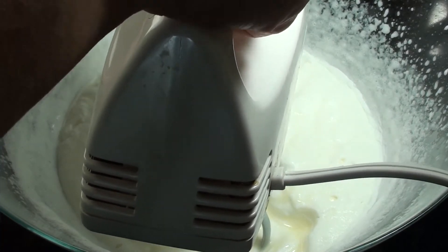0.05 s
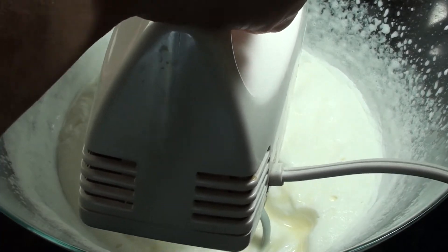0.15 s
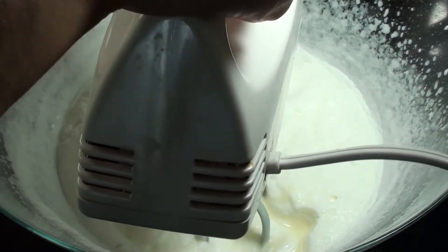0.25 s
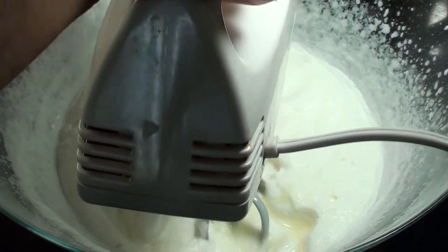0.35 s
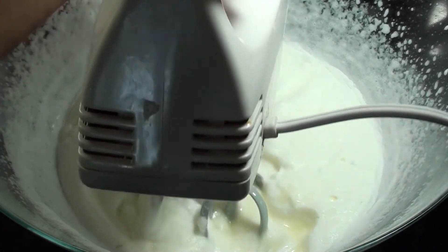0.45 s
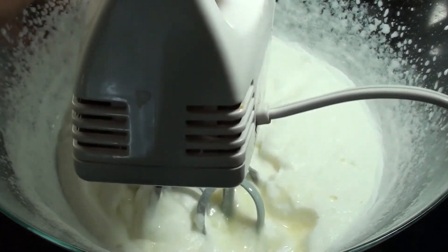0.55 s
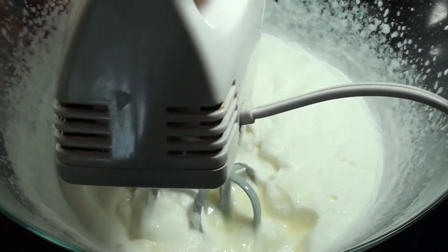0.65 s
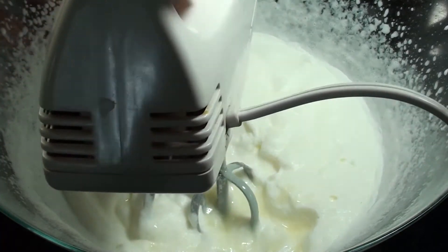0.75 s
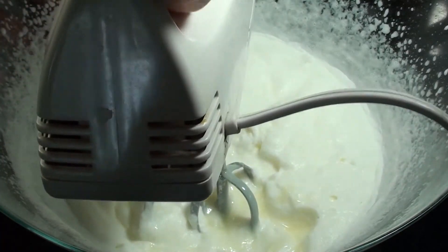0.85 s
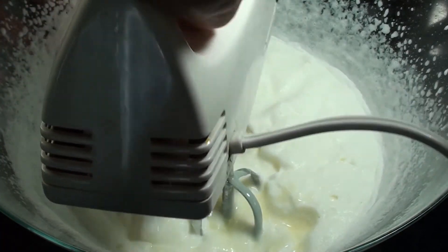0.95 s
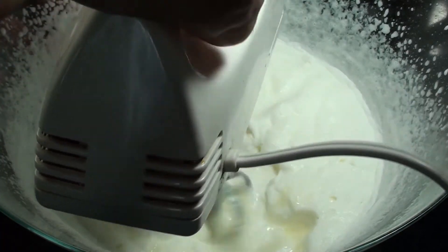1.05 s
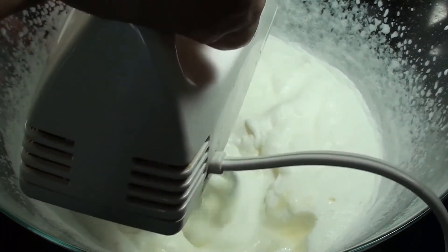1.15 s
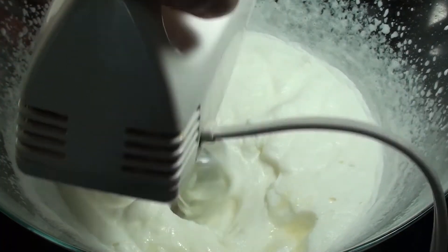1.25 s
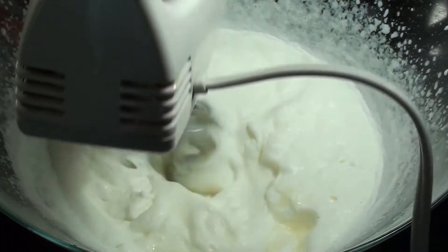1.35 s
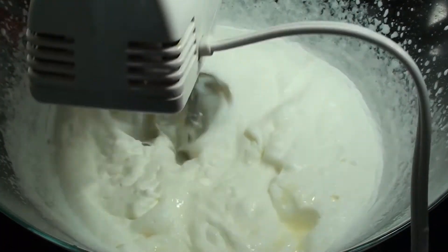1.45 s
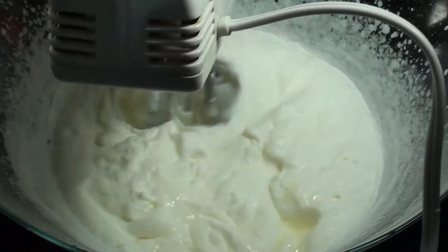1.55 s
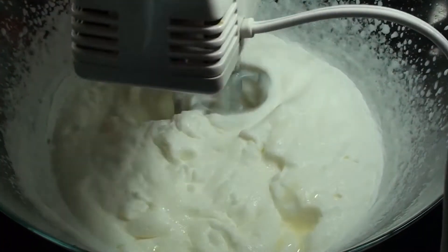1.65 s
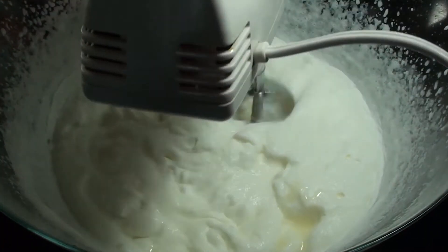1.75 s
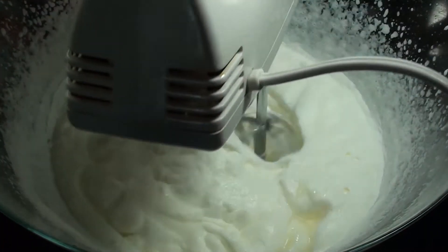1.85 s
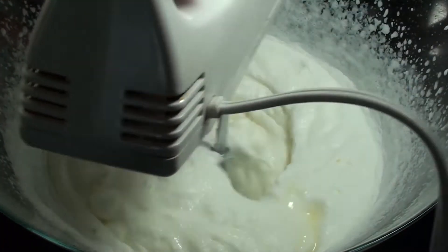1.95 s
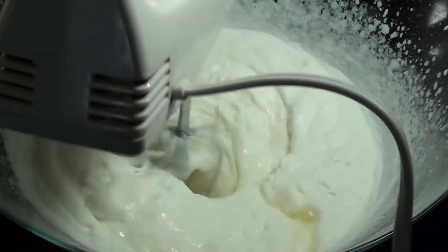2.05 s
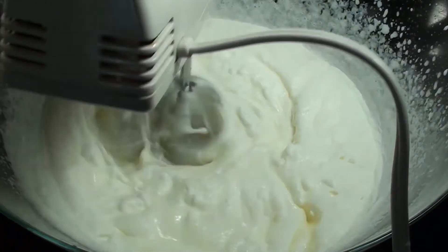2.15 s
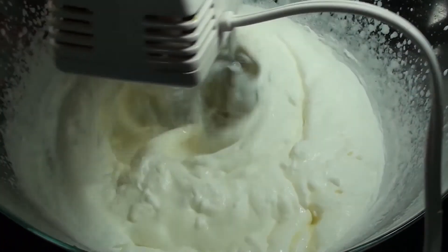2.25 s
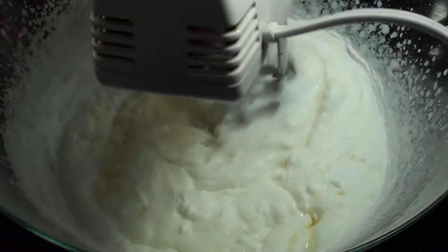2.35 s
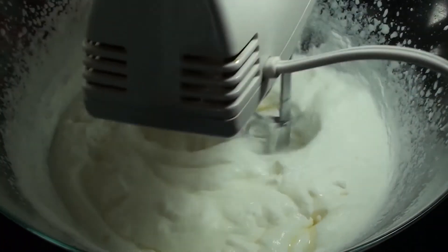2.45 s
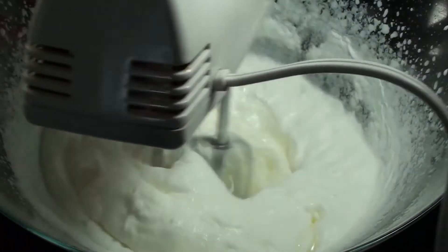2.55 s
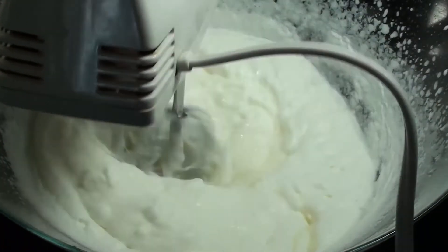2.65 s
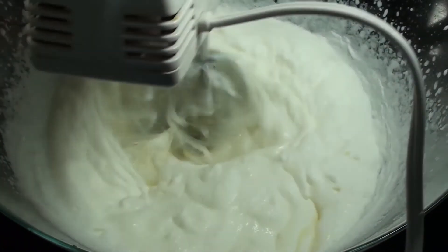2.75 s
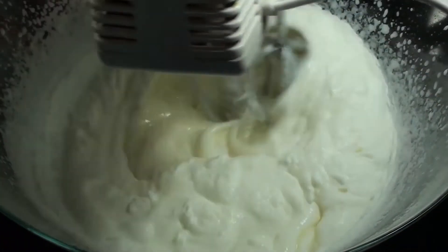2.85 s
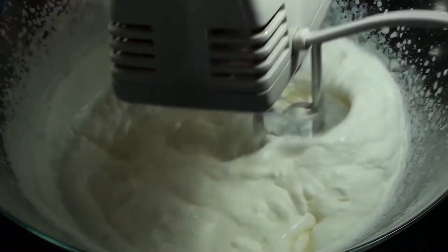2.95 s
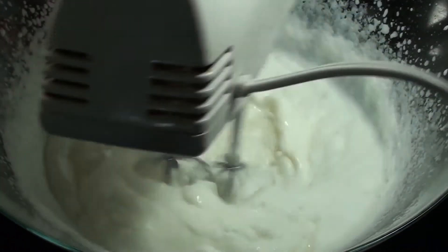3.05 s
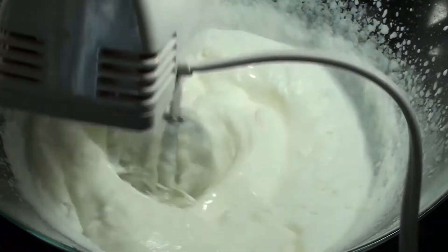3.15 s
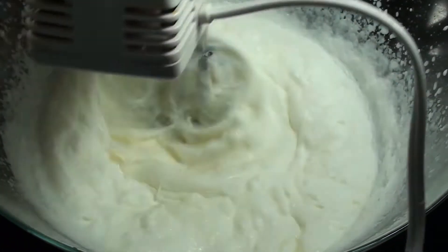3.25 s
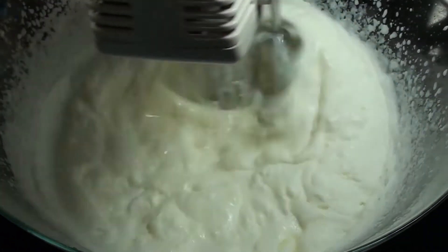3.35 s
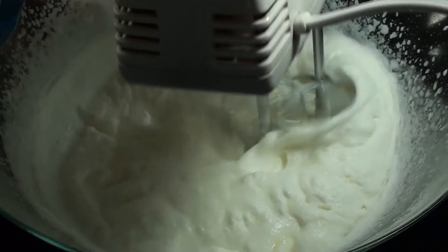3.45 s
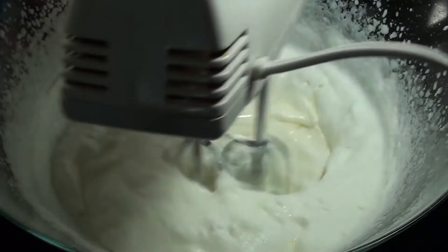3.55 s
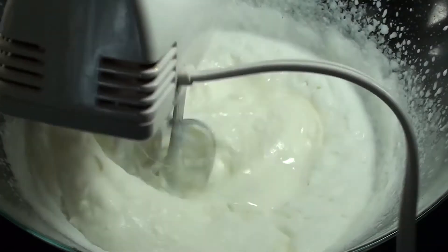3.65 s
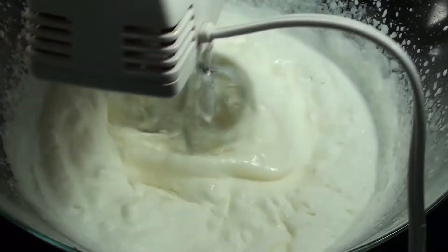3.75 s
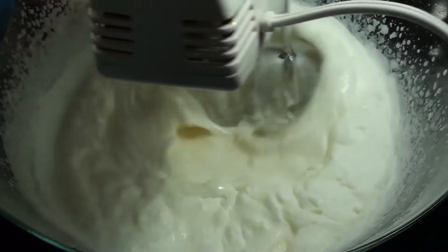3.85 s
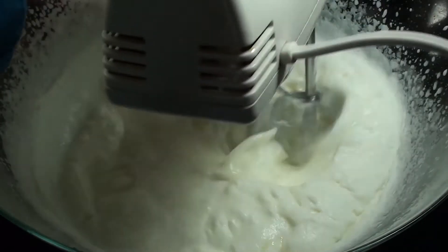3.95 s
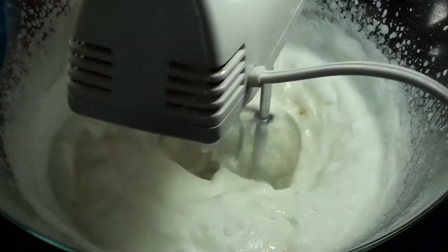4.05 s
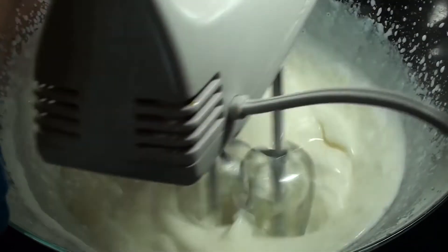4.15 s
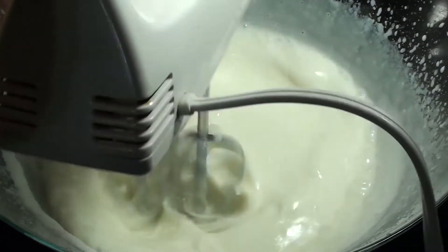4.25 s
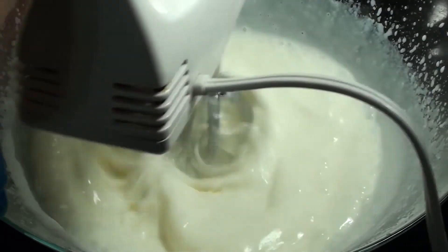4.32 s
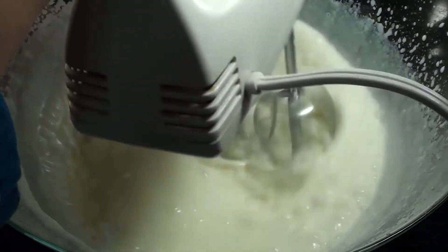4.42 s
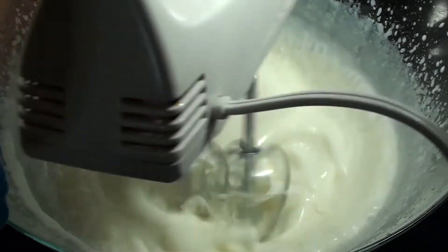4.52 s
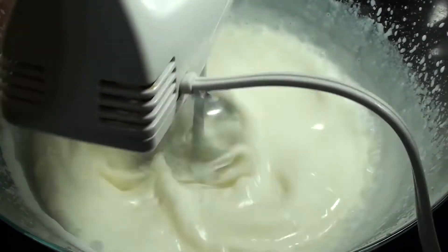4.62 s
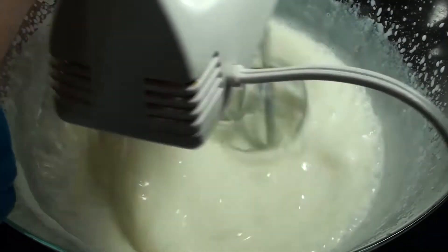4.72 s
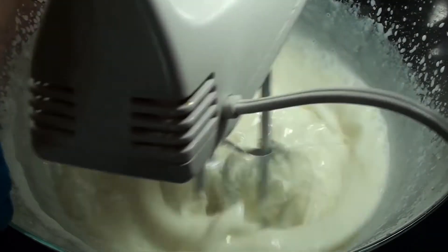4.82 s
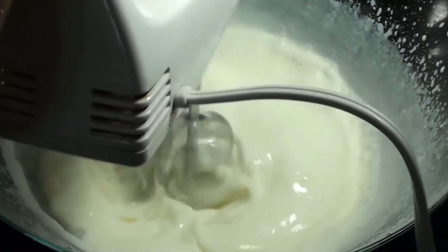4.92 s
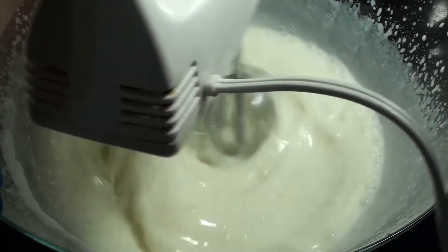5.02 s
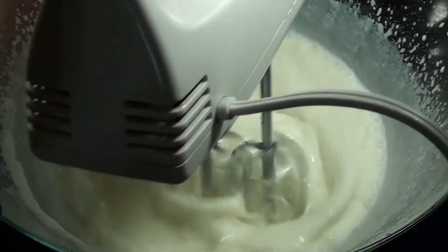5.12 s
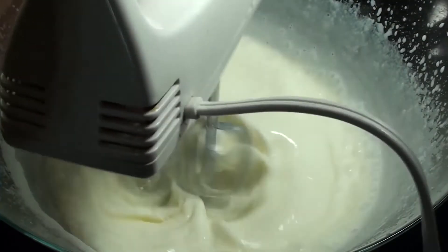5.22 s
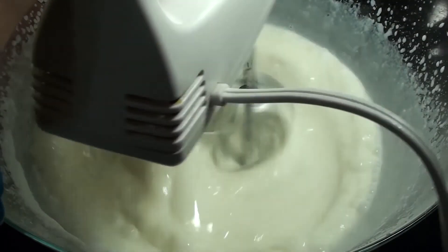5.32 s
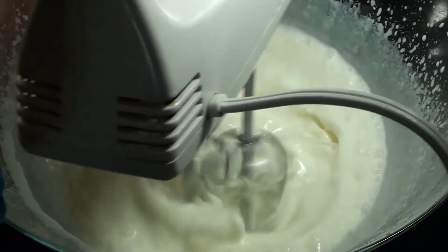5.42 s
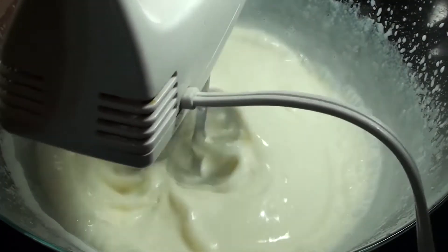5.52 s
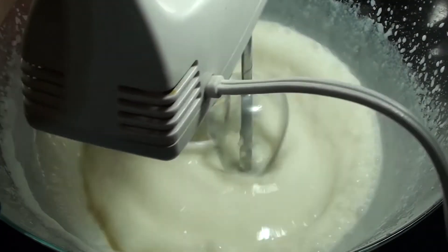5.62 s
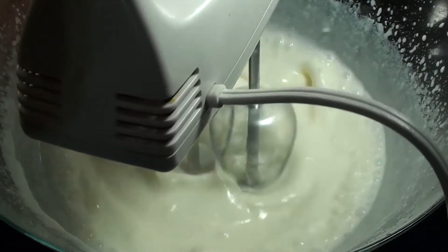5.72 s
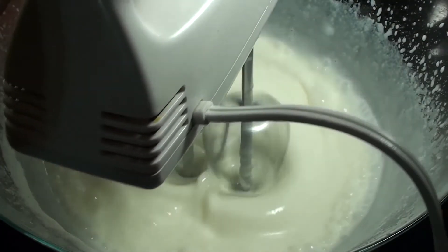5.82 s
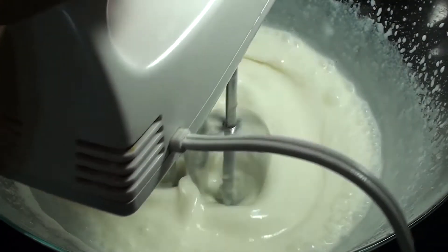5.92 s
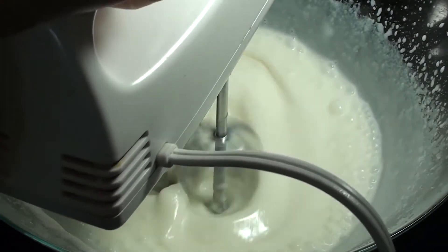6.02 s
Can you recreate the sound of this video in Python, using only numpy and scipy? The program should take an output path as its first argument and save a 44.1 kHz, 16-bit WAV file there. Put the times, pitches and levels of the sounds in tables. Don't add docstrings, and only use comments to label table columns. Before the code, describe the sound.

Quiet kitchen hush with faint handling ticks and a thumb rub, then a switch click. A hand mixer close to the microphone revs up fast, its motor whining and housing rattling while beaters clatter on glass. It labours on with wavering whistle and short clink bursts, then suddenly eases to a smoother, slightly higher drone until the end.

```python
import sys
import numpy as np
from scipy import signal
from scipy.fft import rfft, irfft, next_fast_len
from scipy.io import wavfile
from scipy.ndimage import uniform_filter1d, minimum_filter1d, map_coordinates

SR = 44100
rng = np.random.default_rng(int(sys.argv[2]) if len(sys.argv) > 2 else 0)


def persist_wave(psi):
    counts = np.round(np.clip(psi, -1, 1) * 32767).astype(np.int16)
    wavfile.write(sys.argv[1], SR, np.atleast_2d(counts).T)


def gain_from_decibels(decibels):
    exponent = np.asarray(decibels, float) / 20
    return 10 ** exponent


N = 268236

# time_s, shaft_hz (turns per second)
SPEED_FIRST = [(1.1, 330), (1.35, 326), (1.5, 328), (2.1, 343.5), (2.3, 352.6), (2.5, 358.5),
               (2.85, 364.2), (3.05, 371.3), (3.2, 371.3), (3.6, 376.4), (3.8, 373.9), (4.1, 375.3)]
SPEED_SECOND = [(4.09, 388.7), (5.05, 386.7), (5.53, 388), (6.08, 392.2)]
SWITCH_S, SPIN_UP_S, CRAWL_HZ = 1.0, 0.2, 25
# time_s, level_db
EFFORT_FIRST = [(1.0, -35), (1.02, -16), (1.044, -12), (1.059, -3), (1.14, -2), (1.31, 2.5), (1.9, 2),
                (2.35, -1), (2.87, 2), (3.08, 1.5), (3.25, -1), (3.34, -1.5), (3.65, 3), (4.09, 1.5),
                (4.12, 3)]
EFFORT_SECOND = [(4.1, 1), (4.2, -0.92), (6.08, -1.5)]
# time_s, level_db (rms)
FAN_FIRST = [(1.24, -39), (1.29, -16), (1.5, -26.5), (1.7, -19), (2.0, -14.5), (2.32, -7.5), (2.42, -12),
             (2.47, -20), (2.56, -12), (2.85, -9), (3.05, -17.5), (3.35, -13), (3.6, -19.5), (3.8, -14),
             (4.1, -20)]
FAN_SECOND = [(4.1, -22), (5.7, -22.5), (6.05, -17.5)]
STRONG = (8, 12, 24, 36)
# first_db, second_db (rms)
TONE_DB = [(-33, -33.5), (-35, -30), (-51, -48)]
TONE_DRIFT_DB, TONE_DRIFT_RATE = 4, 7
# multiple, pitch_hz, width_hz, lift_db
SINGS = [(12, 1090, 320, 18.5), (12, 1590, 230, 10), (12, 2050, 250, 8), (12, 2750, 440, 7),
         (24, 3300, 2000, -15), (24, 5500, 250, 10), (24, 6760, 440, 15), (24, 8250, 93, 4),
         (36, 7800, 700, 14), (36, 10370, 520, 27), (36, 11900, 670, 17)]
# multiple, first_db, second_db (rms)
LOW_ORDERS = [(1, -37, -38), (2, -43, -42), (3, -46, -37), (4, -41, -29.5), (5, -34, -24.5), (6, -42, -46),
              (7, -32, -36), (9, -42, -52), (10, -49, -50), (11, -46, -52), (13, -46, -42), (14, -50, -40),
              (15, -49, -42), (16, -34, -35), (17, -50, -39), (18, -50, -43), (19, -46, -42),
              (20, -45, -47), (21, -42, -40), (22, -42, -41)]
HIGH_DB, HIGH_FALL_DB, SEGMENT_DB = (-46, -45.5), (0.2, 0.48), 6.5
CONTACT_DB = 2
# first_db, second_db, db_per_effort_db, scrape_lift_db
NOISES = [
    (-19.5, -26.5, 0.92, 6.4),
    (-23.5, -21.5, 0.62, 4),
    (-34, -28.5, 0.9, 8),
]
# pitch_hz, width_hz, level_db
HOUSING = [(519, 73, -6.5), (640, 120, -15), (1131, 37, -8), (1323, 166, -13), (1601, 70, -5),
           (2137, 64, 1.5), (2000, 136, -6), (2468, 220, -4), (2776, 150, -5.5), (3230, 26, -1),
           (3387, 117, 0)]
# pitch_hz, level_db (per Hz)
RATTLE = [(60, -50), (160, -44), (300, -8.5), (450, -4.5), (1000, 0), (3000, 1.5), (4500, -21), (6000, -60)]
VENTS = [(300, -20.5), (900, -22), (2000, -2.5), (4000, -0.5), (7500, -1.5), (9000, -11.5), (11000, -16),
         (14000, -20)]
BRUSH = [(5000, -39), (8000, 3.5), (9500, 3.5), (11000, -3.5), (13000, -2.5), (15000, -23), (15800, -1)]
SLOW_AIR_DB = -9
# time_s, peak_db
BLOWS = [(1.0565, -13), (1.0924, -17), (1.0979, -11), (1.1164, -17), (1.1338, -9), (1.1424, -14),
         (1.1588, -11), (1.1714, -14), (1.1847, -12), (1.2067, -11), (1.2204, -14), (1.2334, -14),
         (1.2496, -11), (1.2705, -11), (1.2935, -10), (1.3473, -10), (1.3604, -9), (1.3992, -11),
         (1.4296, -9), (1.4514, -11)]
# start_s, touches, gap_s, peak_db
BURSTS = [
    (2.0438, 6, .0138, -11),
    (2.141, 1, 0, -12),
    (2.1675, 1, 0, -13),
    (2.6524, 4, .0128, -11),
    (3.1093, 1, 0, -10),
    (3.1164, 6, .0137, -11),
    (3.2196, 1, 0, -10),
    (3.6655, 4, .0116, -7),
    (3.7219, 1, 0, -16),
]
WIRE_SCATTER_S, WIRE_SCATTER_DB = 0.0008, 1.2
# offset_hz, level_db
CLUSTER = [(0, 0), (-170, -5), (200, -3), (400, -8)]
# pitch_hz, level_db
GLASS = [(6850, -7.5), (8870, -7), (10600, -16), (11200, -30)]
LOW_RING_HZ, HIGH_RING_HZ, HIGH_RING_DB = 5920, 8200, -6
RING_SCATTER = 0.01
CLINK_DB, DUCKING = 4, 11
SCRAPE_S = 0.035
# time_s, peak_db, pitch_hz, width_hz
TICKS = [(0.064, -37.5, 2000, 2560), (.083, -40, 2500, 4000), (.102, -50, 3000, 1500),
         (0.292, -45, 3000, 1200), (.434, -43, 7500, 5000), (.448, -50, 4600, 900), (.606, -39, 1200, 1200),
         (.62, -45, 720, 200), (1.010, -28, 2000, 1500), (1.016, -19, 7000, 9000),
         (1.021, -26, 14200, 1500), (1.033, -29, 14000, 1500)]
# time_s, level_db (rms)
RUB = [
    (.8, -80),
    (.87, -60),
    (.94, -66),
    (1.0, -57),
    (1.02, -80),
]
# pitch_hz, level_db (rms)
HUM = [(59.2, -57.5), (570, -62.5), (1954, -71.5)]
# pitch_hz, level_db (per Hz)
KITCHEN = [(25, -18), (92, -14), (200, -11), (344, -5), (575, -7), (1100, -13), (2050, -20.5),
           (5140, -23.5), (16000, -26.5)]
KITCHEN_DB = -52
# pitch_hz, side_db (relative to the middle)
WIDTH = [(60, -41), (200, -27), (380, -17.5), (700, -9), (1290, -16.5), (4400, -13.5), (8120, -13.5),
         (15000, -50)]


def mixer():
    t = np.arange(N) / SR
    first = np.clip((t - 1.003) / 0.016, 0, 1) * np.clip((4.124 - t) / 0.0026, 0, 1)
    second = np.clip((t - 4.099) / 0.0036, 0, 1)
    touches = clinks()
    glass = bowl(touches)
    shakes = sum(np.exp(-np.clip(t - s, 0, 1) / SCRAPE_S) * (t > s) for s in touches[:, 0])
    scrape = np.minimum(shakes, 1)
    loudness = np.sqrt(abs(uniform_filter1d(glass ** 2, size=900, origin=350)))
    ducked = 1 / (1 + DUCKING * loudness)
    first_run = motor(SPEED_FIRST, FAN_FIRST, EFFORT_FIRST, scrape, column=1, rattle_db=0.5, tilt_db=0.35)
    second_run = motor(SPEED_SECOND, FAN_SECOND, EFFORT_SECOND, scrape, column=2, rattle_db=9.5, tilt_db=2.0)
    first_run = ducked * first * first_run + glass
    both = held(held(first_run, top=0.64) + held(second * second_run, top=0.69), top=0.86)
    return filtered(both, lambda f: (0.036 * 90 ** 4 + f ** 4) / (f ** 4 + 90 ** 4))


def motor(turns, fan, effort_rows, scrape, column, rattle_db, tilt_db):
    tones, angle, slow = whine(turns, fan, column)
    effort = curves(effort_rows)[0]
    rattle, air, brush = (row[column - 1] + row[2] * effort + row[3] * scrape for row in NOISES)

    def body(f):
        rings = sum(gain_from_decibels(db + tilt_db * np.log2(hz / 2000)) * resonance(f, hz, width)
                    for hz, width, db in HOUSING)
        return 0.17 + rings

    knocks = patchy(1.0) * gain_from_decibels(0.88 * wobble(55))
    gears = unit(filtered(knocks, lambda f: body(f) * gain_from_decibels(along(RATTLE, f))))
    dull = np.clip(1.84 * slow - 0.3, 0, 1)
    dull_gears = unit(filtered(gears, lambda f: 1 / (1 + (f / 1500) ** 4)))
    gears = (1 - dull) * gears + dull * dull_gears * 0.69
    grains = uniform_filter1d(rng.exponential(size=N) ** 2, size=24)
    spit = gain_from_decibels(np.minimum(1.23 * grains, 7))
    chopped = patchy(2.15) * (1 + 0.76 * np.sin(STRONG[0] * angle)) * spit
    vents = unit(filtered(chopped, lambda f: gain_from_decibels(along(VENTS, f)) * (1 + 0.62 * resonance(f, 5340, 350))))
    hiss = unit(filtered(patchy(1.3) * spit, lambda f: gain_from_decibels(along(BRUSH, f))))
    shudder = unit(filtered(patchy(0.96), lambda f: resonance(f, 164, 270) ** 2))
    gears = gears + gain_from_decibels(-36 + 38 * np.minimum(slow, 0.35)) * shudder
    tones = (1 - dull) * tones + 2.1 * dull * filtered(tones, body)
    tones = tones * gain_from_decibels(np.minimum(effort + CONTACT_DB, 0))
    noise = gain_from_decibels(rattle + rattle_db) * gears + gain_from_decibels(air + SLOW_AIR_DB * slow + 4.0) * vents
    return tones + noise + gain_from_decibels(brush + 4.5) * hiss


def whine(turns, fan, column):
    t = np.arange(N) / SR
    spin = 1 - np.exp(-np.maximum(t - SWITCH_S, 0) / SPIN_UP_S)
    speed = np.maximum(curves(turns)[0] * spin, CRAWL_HZ)
    angle = 2 * np.pi * np.cumsum(speed * (1 + 0.0003 * wobble(30))) / SR
    slow = np.clip(1 - speed / speed[-1], 0, 1)
    out = gain_from_decibels(-78.0 + 3.2 * wobble(8)) * np.sin(2 * np.pi * 119 * t)
    for k, db in zip(STRONG, strong_db(speed, fan, column)):
        flicker_db = (2.0 * np.sqrt(k / STRONG[0]) + 4.5 * slow) * wobble(40)
        shake = 0.39 * wobble(58) + 2.2 * slow * wobble(170)
        out += gain_from_decibels(db + flicker_db) * np.sin(k * angle + shake)
    high = [*range(23, 50), *range(50, 74, 2)]
    faint = []
    for k in high:
        if k not in STRONG:
            lift = SEGMENT_DB * (k % STRONG[1] == 0) * (k - STRONG[3]) / STRONG[1]
            levels = np.array(HIGH_DB) - (k - high[0]) * np.array(HIGH_FALL_DB) + lift
            faint.append((k, *levels))
    for row in [*LOW_ORDERS, *faint]:
        k = row[0]
        shaky = min(k / 3, 1)
        growth = 40 / np.sqrt(k) * np.log10(np.minimum(1.17 - slow, 1))
        db = row[column] + growth + shaky * (1.6 * wobble(2.76) + 3.2 * wobble(28))
        out += gain_from_decibels(db) * np.sin(k * angle + rng.uniform(0, 2 * np.pi)) * (k * speed < 16000)
    return np.sqrt(2) * out, angle, slow


def strong_db(speed, fan, column):
    levels = [curves(fan)[0]]
    levels += [db[column - 1] + TONE_DRIFT_DB * wobble(TONE_DRIFT_RATE) for db in TONE_DB]
    return [db + sum(lift * np.exp(-((k * speed - hz) / width) ** 2)
                     for m, hz, width, lift in SINGS if round(m) == k)
            for k, db in zip(STRONG, levels)]


def clinks():
    runs = np.array([(s + k * gap, db, k > 0) for s, count, gap, db in BURSTS for k in range(count)])
    scatter = rng.standard_normal((len(runs), 2)) * [WIRE_SCATTER_S, WIRE_SCATTER_DB] * runs[:, 2:]
    return np.vstack([BLOWS, runs[:, :2] + scatter])


def bowl(touches):
    out, cracks = np.zeros(N + SR), np.zeros(N + SR)
    t = np.arange(SR // 10) / SR
    for (s, db), chance in zip(touches, rng.standard_normal((len(touches), 14, 2))):
        low_hz, high_hz = [LOW_RING_HZ, HIGH_RING_HZ] * (1 + RING_SCATTER * chance[-1])
        high_db = HIGH_RING_DB + 3 * chance[-2, 0]
        low = [(low_hz + split, level) for split, level in CLUSTER]
        high = [(high_hz + 1.25 * split, level + high_db) for split, level in CLUSTER]
        fade_db = -60 * t / 0.065
        ring = 0
        for (hz, level), (luck, detune) in zip([*low, *high, *GLASS], chance):
            angle = 2 * np.pi * hz * (1 + 0.006 * detune) * t + 3 * luck
            ring = ring + gain_from_decibels(level + 2 * luck + fade_db) * np.sin(angle)
        start = round(s * SR)
        out[start:][:len(t)] += gain_from_decibels(db + CLINK_DB) * ring / abs(ring).max() * (1 - np.exp(-t / 0.0003))
        cracks[start:][:len(t)] += gain_from_decibels(db + CLINK_DB - 5 - 60 * t / 0.03) * rng.standard_normal(len(t))

    def crack_colour(f):
        return resonance(f, 6000, 900) + 0.9 * resonance(f, 8200, 900) + 0.3 * resonance(f, 10800, 1500)

    return out[:N] + filtered(cracks[:N], crack_colour)


def hand():
    out, t = np.zeros(N + SR), np.arange(SR // 20) / SR
    f = np.fft.rfftfreq(len(t), 1 / SR)
    for s, db, hz, width_hz in TICKS:
        burst = gain_from_decibels(-60 * t / 0.028) * rng.standard_normal(len(t))
        puff = irfft(rfft(burst) * resonance(f, hz, width_hz) ** 2, len(t))
        out[round(s * SR):][:len(t)] += gain_from_decibels(db) * puff / abs(puff).max()
    return out[:N]


def thumb():
    rub = filtered(patchy(4), lambda f: resonance(f, 5200, 500) + resonance(f, 6200, 1500))
    return gain_from_decibels(curves(RUB)[0]) * unit(rub) * (np.arange(N) < 1.02 * SR)


def kitchen():
    t = np.arange(N) / SR
    hush = gain_from_decibels(KITCHEN_DB) * unit(filtered(patchy(0.97), lambda f: gain_from_decibels(along(KITCHEN, f))))
    hum = sum(gain_from_decibels(db + 0.72 * wobble(2.1)) * np.sqrt(2) * np.sin(2 * np.pi * hz * t) for hz, db in HUM)
    return (hush + hum) * gain_from_decibels(np.interp(t, [1.1, 2.0], [0, -7]))


def held(x, top):
    need = minimum_filter1d(np.minimum(1, top / (abs(x) + 1e-9)), size=441)
    return x * uniform_filter1d(need, size=331)


def patchy(patchy_db):
    z = signal.stft(rng.standard_normal(N), nperseg=512)[2]
    field = uniform_filter1d(rng.standard_normal(z.shape), size=5, axis=0)
    field = uniform_filter1d(field, size=10, axis=1)
    return signal.istft(z * gain_from_decibels(patchy_db * unit(field)), nperseg=512)[1][:N]


def resonance(f, hz, width_hz):
    return 1j * f * width_hz / (hz * hz - f * f + 1j * f * width_hz)


def filtered(x, response):
    m = next_fast_len(N + 8192)
    return irfft(rfft(x, m) * response(np.fft.rfftfreq(m, 1 / SR)), m)[..., :N]


def wobble(rate):
    knots = rng.standard_normal(int(N * 300 / SR) + 4)
    return map_coordinates(knots, [np.arange(N) * min(rate, 299) / SR], order=1)


def curves(rows):
    s, *cols = np.transpose(rows)
    return [np.interp(np.arange(N) / SR, s, c) for c in cols]


def along(points, hz):
    f, v = np.transpose(points)
    return np.interp(np.log(hz + 1), np.log(f + 1), v)


def unit(x):
    return x / np.sqrt(np.mean(x ** 2) + 1e-20)


def scene():
    mid = mixer() + hand() + thumb() + kitchen()
    t = np.arange(SR // 10) / SR
    tails = rng.standard_normal((4, len(t))) * gain_from_decibels(-60 * t / 0.18)
    answers = signal.fftconvolve(mid[None], tails / np.linalg.norm(tails), axes=1)[:, :N]
    diffuse = sum(a * 1.1 * wobble(25) for a in answers)
    side = filtered(diffuse, lambda f: gain_from_decibels(along(WIDTH, f)))
    side = side - 0.025 * filtered(mid, lambda f: resonance(f, 1500, 6000))
    return np.array([mid + side, mid - side])


def low_pass(x):
    return signal.sosfilt(signal.butter(12, 16480, fs=SR, output="sos"), x)


def record(dry):
    mix = filtered(dry, lambda f: f < 15790)
    return low_pass(mix)


dry = scene()
out = record(dry)
persist_wave(out)
```